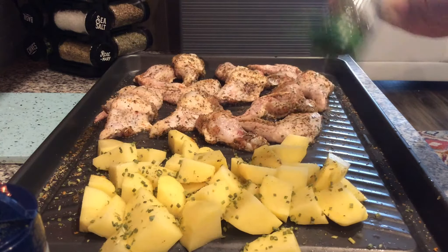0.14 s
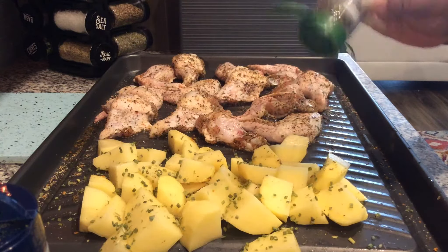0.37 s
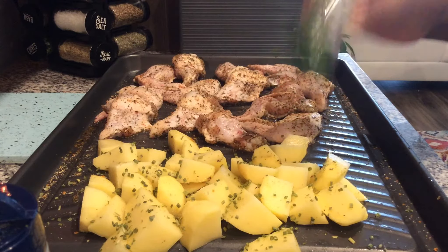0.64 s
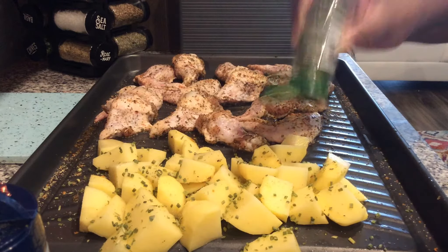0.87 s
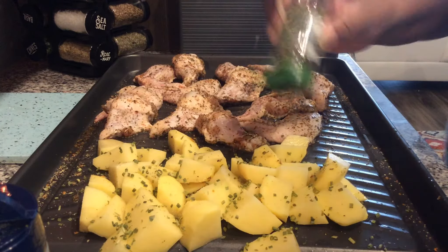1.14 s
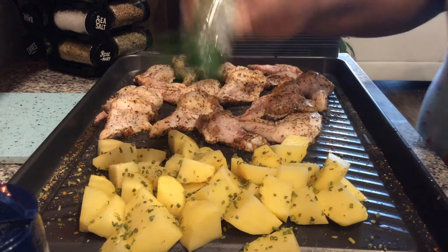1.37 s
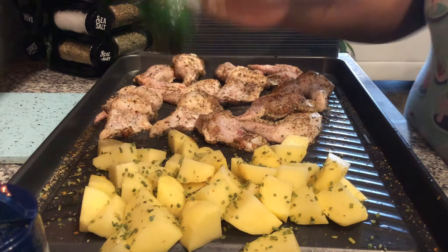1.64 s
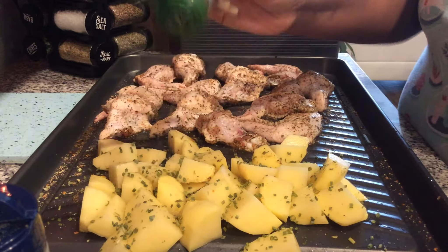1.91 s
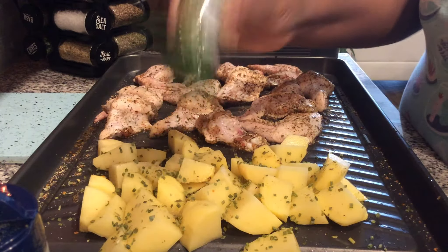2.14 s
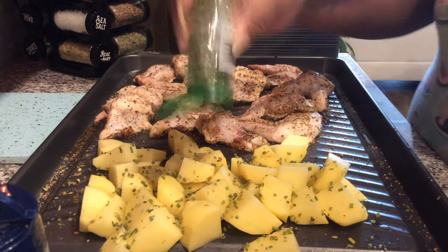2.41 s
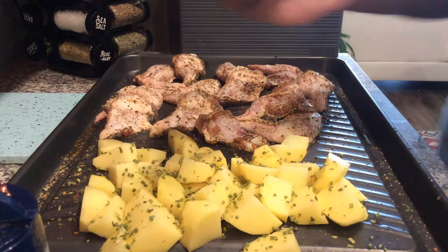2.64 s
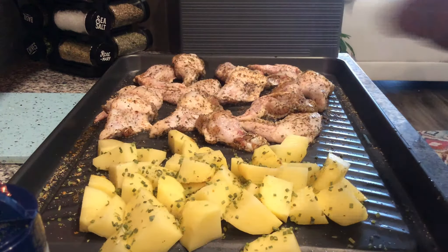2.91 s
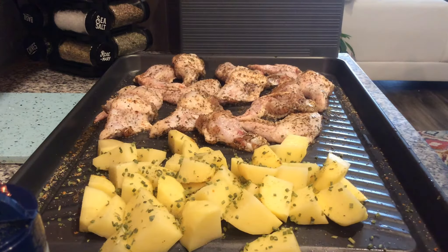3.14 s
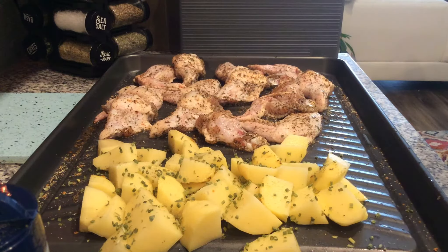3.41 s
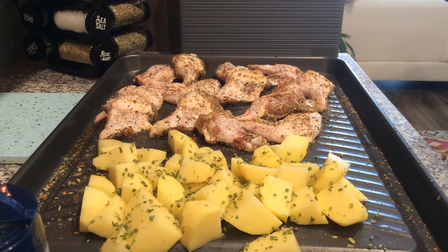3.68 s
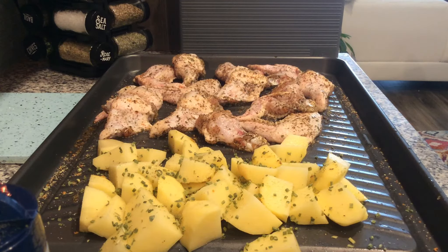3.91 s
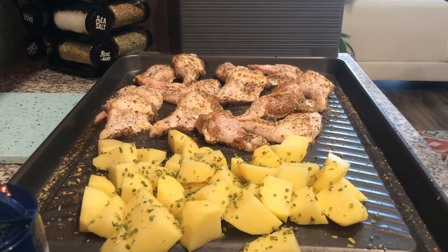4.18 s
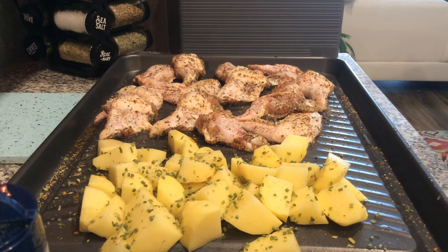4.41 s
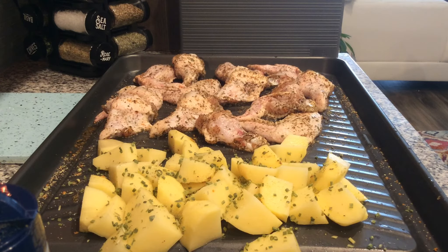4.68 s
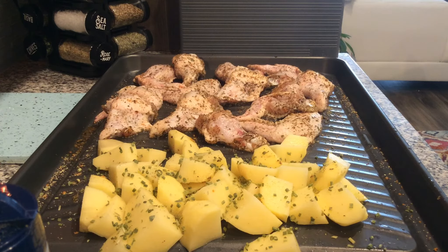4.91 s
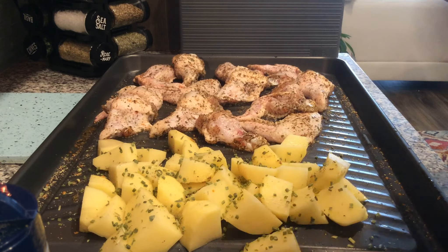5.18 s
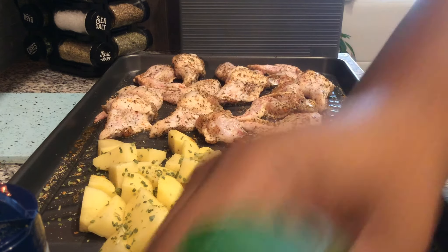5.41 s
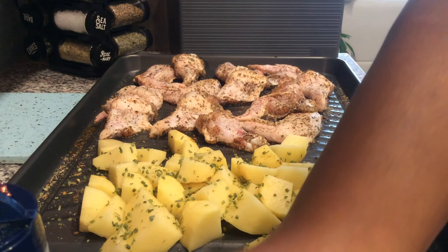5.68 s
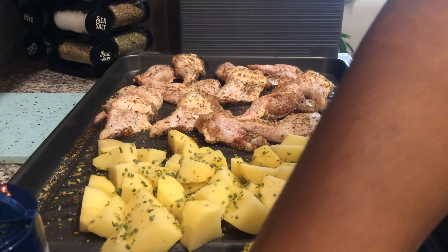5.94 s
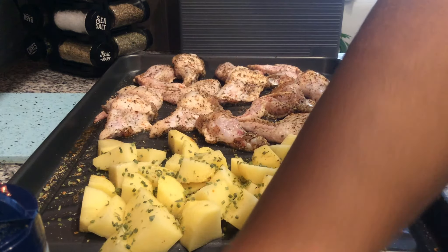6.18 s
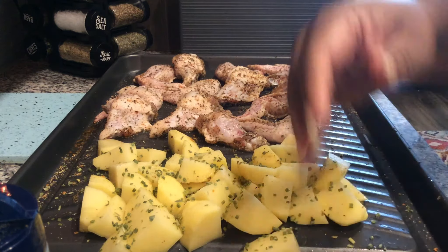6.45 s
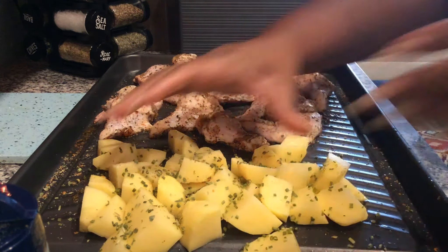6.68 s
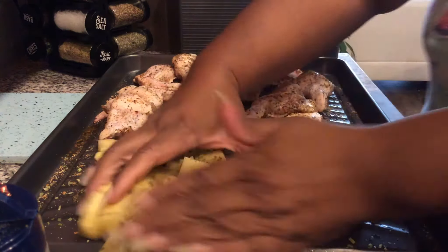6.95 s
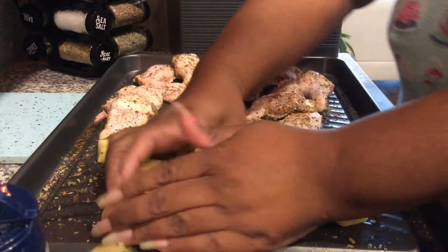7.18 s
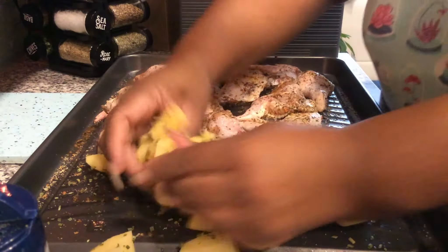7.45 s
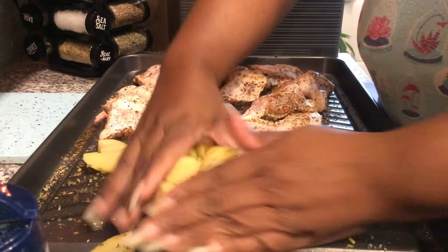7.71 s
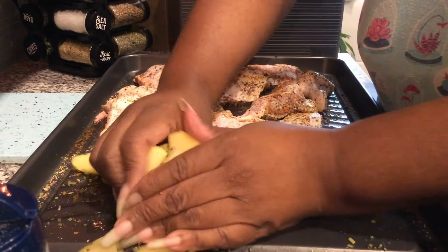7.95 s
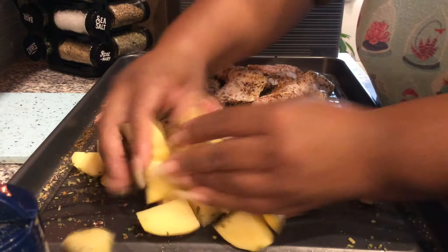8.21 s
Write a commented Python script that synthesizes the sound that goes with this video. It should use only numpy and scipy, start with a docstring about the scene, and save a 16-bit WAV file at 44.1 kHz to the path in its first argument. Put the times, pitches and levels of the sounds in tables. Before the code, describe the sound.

Dry herbs shaken in a jar over a kitchen hum, a glass clink and lid snap, a bottle knocked down, then potatoes tumbled on a pan.

```python
"""A kitchen hums and hisses throughout, built from shaped noise and wavering tones. First a glass jar of
dry herbs is shaken in bursts of fine and coarse grains; it clinks, its lid snaps shut and it is put away
with a tap, all ringing tones plus noise bursts. Then a bottle is set down hard on the counter and rocks once.
Last, two hands sweep cut potatoes over a ribbed pan (swelling grainy noise, catching nails), lift them
and let them tumble (damped low thuds, a knocking rim and a booming pan)."""
import sys
import numpy as np
from scipy import signal
from scipy.fft import rfft, irfft, next_fast_len
from scipy.io import wavfile
from scipy.ndimage import uniform_filter1d, map_coordinates

SR = 44100
rng = np.random.default_rng(int(sys.argv[2]) if len(sys.argv) > 2 else 0)


def put_to_file(sound):
    """Save the sound as 16-bit audio at rate SR, in the file named by the first command-line argument."""
    columns = np.atleast_2d(sound).T  # one column per channel
    safe = np.clip(columns, -1, 1)
    whole_steps = np.round(safe * 32767)
    wavfile.write(sys.argv[1], SR, whole_steps.astype(np.int16))


def voltage_ratio(decibels):
    """Convert decibels (scalar or array-like) to amplitude ratios, 20 dB per decade."""
    exponent = np.asarray(decibels, float) / 20
    return 10 ** exponent


N = 367201  # length in samples

# Every "colour" table is the shape of a spectrum: pitch_hz, level_db (per Hz, relative)

# kitchen background over time: time_s, hum_db, midrange_rush_db, hiss_db
KITCHEN_LEVELS = [(0, -40, -62, -60), (2.2, -39.5, -63.5, -54), (2.6, -38.5, -53.5, -52.5),
                  (3.3, -37.5, -57, -56), (3.95, -38, -55, -51), (4.6, -38.5, -56.5, -55),
                  (5.8, -39, -63, -59.5), (6.4, -38.5, -58.5, -59), (7, -39, -55, -52.5),
                  (8.33, -38.5, -56, -50.5)]
# colours of the hum, the midrange rush and the hiss: pitch_hz, level_db
HUM_COLOUR = [(15, -62), (25, -28.5), (43, -15.5), (115, -0.5), (213, -5.5), (244, 1), (275, -15),
              (338, -7.5), (388, -10.5), (444, -14), (743, -20.5), (1060, -22.5), (1500, -29.5),
              (1950, -60), (3300, -120)]
RUSH_COLOUR = [(450, -37.5), (650, -4.5), (760, 11.5), (900, -14), (1250, -0.5), (1500, 1), (1800, -20),
               (2600, -13), (3500, -42)]
HISS_COLOUR = [(880, -30.5), (1500, 0), (2460, 1.5), (2610, -5), (2880, 1.5), (3120, -0.5), (4640, -3),
               (5380, -2.5), (6690, -5), (9280, -2), (10000, -3), (14900, -9.5), (16000, -26)]
# wavering appliance tones: pitch_hz, level_db (on top of the hum level), waver_hz
APPLIANCE_TONES = [(56, -15, 2.6), (83.7, -13, 0.96), (120, -9, 2.5), (252.6, -8, 1.5),
                   (337.5, -12.5, 1.986), (448, -17.5, 2), (2960, -30, .8)]

# herbs landing in the jar at the end of each stroke:
# peak_s, level_db, length (times the usual slap), coarse_db (against level_db)
SHAKES = [(.009, -38, 1.7, -11), (.077, -50, 1, -8), (.134, -49.5, 0.99, -9), (.213, -41.5, 1.55, -7.5),
          (.35, -50, 0.89, -10), (0.416, -44.5, 1.7, -7), (0.633, -41.5, 1.2, -7.5),
          (0.847, -38, 1.5, -6.5), (1.052, -39, 1.24, -11.5), (1.279, -39, 1.33, -8.5),
          (1.496, -35, 1.15, -14), (1.712, -33, 1.06, -10), (1.935, -29, 0.91, -13.5),
          (2.142, -33, 1.17, -14), (2.34, -37.5, 1.06, -10), (2.544, -37, 1.4, -10.5)]
# colours of the fine herbs and of coarser bits against the lid: pitch_hz, level_db
HERB_COLOUR = [(710, -57.5), (1200, -26.5), (1440, -11), (1630, -22), (2060, -19.5), (2320, -20),
               (2980, -15), (4650, -13.5), (5300, -14.5), (8500, -2.5), (9310, 0.5), (10100, -3.5),
               (13600, -5.5), (15500, -8.5), (16300, -36)]
RATTLE_COLOUR = [(1500, -36), (2000, -6), (2500, -6.5), (3000, -3), (3400, 0.5), (4000, -3.5), (5500, -9),
                 (7000, 0), (9000, -41)]
# flakes sliding between strokes, and narrow hiss: time_s, flakes_db, one_band_db, three_bands_db
SLIDE_LEVELS = [(0, -65.5, -80, -80), (.8, -62, -80, -80), (1.55, -68, -75, -80), (1.7, -57.5, -61, -76),
                (2.3, -57, -59, -66), (2.7, -61, -59, -61.5), (3.7, -55, -65.5, -65.5),
                (4.1, -80.5, -66.5, -51), (5, -80, -78.5, -72.5), (8.4, -70, -93, -90.5)]
# colours of the one band and of the three other bands: pitch_hz, level_db
ONE_BAND_COLOUR = [(7300, -51), (7950, -18), (8150, -5.5), (8280, 1.5), (8420, -9), (8900, -40.5)]
THREE_BANDS_COLOUR = [(5800, -40.5), (6200, -15.5), (6300, -1.5), (6420, -12.5), (7300, -40.5), (8500, -17),
                      (8600, -0.5), (8720, -17.5), (9280, -19), (9400, 0.5), (9520, -17), (10500, -46.5)]
SHAKE_RISE_S, SHAKE_FALL_S = 0.0061, 0.0082  # the usual slap
SKIRT_DB, SKIRT_LONGER = -16, 3.8  # stray flakes before and after the slap

# short swells of narrow hiss, from the jar in the hand and from wet skin on the pan:
# peak_s, rise_s, fall_s, level_db, pitch_hz
SQUEAKS = [(.215, 0.0069, 0.0097, -54, 3230), (.305, .008, .008, -51, 1500), (.355, .005, .012, -54, 6400),
           (.478, .006, .008, -54, 1600), (.48, 0.006, 0.0074, -54, 2300), (.78, 0.054, 0.088, -59.5, 2900),
           (1.595, 0.0045, .01, -57, 2210), (1.95, 0.054, 0.15, -60, 1430), (1.97, 0.043, .05, -54, 2620),
           (2.56, 0.019, 0.087, -53.5, 1366), (7.24, 0.018, .02, -39, 4370), (7.25, .015, .015, -33, 8200),
           (7.27, .02, .02, -36, 5670), (7.286, .02, .015, -41.5, 3830), (7.305, .015, .01, -45.5, 2380),
           (7.365, .003, 0.015, -40.5, 5300), (7.375, .006, .008, -40.5, 2830),
           (7.38, 0.011, 0.0091, -32, 4030), (7.452, .003, 0.0093, -37.5, 4120),
           (7.452, .003, .008, -42, 5300), (7.49, .02, 0.026, -37, 9700), (7.515, .025, .03, -40, 9200),
           (7.99, .015, 0.034, -43, 8160), (8.075, .02, 0.031, -40, 8200),
           (8.027, 0.004, 0.0059, -29, 7800), (8.242, 0.014, 0.0087, -36, 8300)]
SQUEAK_WIDTH = 0.06  # share of its pitch

# soft low bumps through the counter: start_s, level_db, pitch_hz, t60_s (time to die by 60 dB)
BUMPS = [(1.43, -23, 94, 0.086), (2.53, -28, 120, 0.27), (2.6, -24, 56, 0.11), (5.9, -15.5, 74.6, 0.21),
         (5.902, -26.5, 222, 0.38)]
# small ticks of things in the hand: start_s, level_db, tilt_db (per octave)
TICKS = [(1.6541, -39.5, 2), (1.8833, -43.5, 3), (3.1338, -43.5, 2), (3.275, -49.5, -3),
         (3.3633, -38.5, -5.5), (3.5125, -45, -6), (4.5361, -41.5, 1), (4.6483, -44.5, 0), (4.78, -45, 3.5),
         (4.8357, -40.5, 1), (4.9442, -40, -3), (4.981, -46.5, -11), (5.1577, -42.5, -1.5),
         (5.5243, -48.5, 12.5)]
# colour of an untilted tick: pitch_hz, level_db
TICK_COLOUR = [(1470, -36), (2500, -14), (3040, -20), (3230, -17), (3800, -4.5), (4340, -11.5),
               (5920, -8.5), (6450, 1.5), (7130, -8.5), (9220, 3), (9890, -3.5), (14100, -7.5),
               (16000, -22)]
TICK_T60_S = 0.055

# Each thing struck has three tables:
#   blows: start_s, ring_db, crack_db, crack_t60_s, contact_s
#   ringing modes: pitch_hz, level_db (on top of ring_db), t60_s
#   colour of the crack: pitch_hz, level_db
# glass clink
CLINK_BLOWS = [(3.8185, -21, -13.5, 0.01, 0.00087), (3.8215, -11, -8, 0.021, 0.00045),
               (3.828, -22, -19, 0.071, 0.0011)]
GLASS_MODES = [(6090, -10, .04), (6145, 2, 0.044), (6380, -21.5, .3), (6420, -22.5, .3), (8230, -8.5, .07)]
GLASS_CRACK = [(180, -54), (300, -26), (1300, -23.5), (3190, -29), (5250, -14), (5900, -11.5), (6150, -3.5),
               (6500, -7), (6960, -16.5), (8220, -9), (12300, -6), (15600, -13.5), (16200, -27.5)]
# lid snapping shut
SNAP_BLOWS = [(3.987, -43.5, -39.5, 0.04, .0017), (3.998, -45.5, -38, 0.05, .001),
              (4.0101, -0.5, -6.5, 0.035, 0.00057), (4.0145, -30.5, -16, 0.042, 0.00025)]
LID_MODES = [(385, -3.5, 0.04), (372, -28, .25), (415, -22.5, .25), (470, -25.5, 0.34), (740, -26, .08),
             (1455, -31.5, 0.33), (1555, 1.5, 0.026), (1530, -27, .4), (1590, -28.5, .35),
             (1620, -1, 0.012), (2100, -11.5, .02), (3350, -7.5, 0.0028)]
LID_CRACK = [(290, -28.5), (480, -3.5), (560, -15.5), (750, -5.5), (1110, -21.5), (1510, -6.5), (1980, -12),
             (2600, -15), (3440, -11), (5240, -21.5), (8330, -9), (10700, -5.5), (15500, -10.5),
             (16200, -33)]
# jar tap
TAP_BLOWS = [(4.2135, -39, -29.5, .02, .0003), (4.2163, -10, -16.5, 0.029, 0.00026)]
JAR_MODES = [(816, -13, 0.038), (1520, -0.5, 0.02), (1890, 11.5, 0.0034), (2230, -3, 0.013),
             (3520, -7, 0.0077)]
JAR_CRACK = [(150, -35), (250, -4), (900, -15.5), (1500, -9.5), (2800, -12), (5800, -23), (9300, -13),
             (12000, -11.5), (14500, -18), (16200, -35.5)]
# bottle set down
KNOCK_BLOWS = [(5.8795, -45.5, -34.5, 0.019, 0.00097), (5.891, -48, -29, 0.088, 0.00056),
               (5.9032, -9, -3, 0.04, 0.00031), (5.9075, -14, -8, .04, 0.00058),
               (5.913, -30, -13, .04, 0.0008), (5.926, -17, -11, 0.06, 0.0017),
               (5.940, -20.5, -13, 0.09, 0.0027), (5.953, -26, -13.5, 0.09, 0.0032),
               (5.96, -21, -11, .05, 0.0038), (5.974, -17, -22, 0.048, .004)]
BOTTLE_MODES = [(428, -3, 0.052), (548, -6, .08), (627, -14.5, 0.05), (711, -4, 0.067), (772, -6, 0.064),
                (951, -10, 0.18), (1205, -11, 0.049), (1470, -0.5, 0.056), (1500, -7.5, 0.026),
                (2120, -2.5, .04), (2260, -6.5, 0.088), (2337, -3.5, 0.032), (2642, -8.5, 0.08),
                (2890, -12, 0.099)]
BOTTLE_CRACK = [(120, -46), (200, -12), (299, -12.5), (612, -1.5), (1300, -10.5), (1590, -6), (2300, -10),
                (3800, -14), (4700, -18.5), (5150, -20), (5800, -28), (8900, -27), (14500, -32),
                (16200, -48)]
# bottle rocking, with the same bottle modes
ROCK_BLOWS = [(6.0427, -18.5, -11.5, 0.024, 0.0003), (6.0468, -16.5, -8, 0.028, 0.00064),
              (6.0522, -21, -12, 0.032, 0.0004), (6.0575, -23, -14, 0.029, .0006),
              (6.0625, -26, -11.5, 0.031, 0.0008), (6.0695, -32, -14, 0.033, .0012),
              (6.077, -24.5, -21, .04, .002), (6.106, -43, -27, .04, .001), (6.119, -41, -30, 0.034, .0015),
              (6.134, -45, -31, .04, .0015)]
ROCK_CRACK = [(120, -42), (200, -11), (440, -17), (696, -2), (836, -5), (1480, -6), (2050, -11),
              (2700, -24), (3100, -19), (5330, -40), (12400, -30.5), (16000, -60)]
DULL_CYCLES = 5.7  # a blow loses the treble that fits more cycles than this into its contact time
WANDER = 0.7  # radians a ring drifts in a hundredth of a second, times the root of its kHz
BLOW_SCATTER_DB = 1.5  # a mode's level changes from blow to blow

# strokes of hands and potato over the pan: peak_s, rise_s, fall_s, hiss_db, scrape_db (against hiss_db)
STROKES = [(7.08, 0.0052, 0.013, -21, -16.5), (7.15, 0.054, 0.042, -45.5, -3),
           (7.259, 0.033, 0.029, -31, -4.5), (7.3, 0.027, 0.013, -63.5, 24),
           (7.37, 0.0072, 0.023, -44.5, 2), (7.419, 0.012, 0.026, -41, -8.5), (7.52, 0.07, 0.12, -40.5, -8),
           (7.87, 0.015, 0.09, -47, -0.5), (7.97, 0.072, 0.045, -38.5, -5.5),
           (8.085, 0.064, 0.017, -35.5, -11), (8.114, 0.048, 0.0088, -37, 6.5),
           (8.245, 0.033, 0.053, -37.5, -12)]
# level of the low drag: time_s, level_db
DRAG_LEVELS = [(7.03, -51.5), (7.08, -43), (7.16, -42), (7.24, -48), (7.3, -36.5), (7.345, -57),
               (7.41, -40), (7.56, -50.5), (7.79, -55), (7.87, -42), (8.06, -37.5), (8.115, -29),
               (8.15, -48), (8.19, -53), (8.25, -44), (8.327, -51)]
# colours of the bright hiss, the mid scrape and the low drag: pitch_hz, level_db
BRIGHT_COLOUR = [(2940, -41), (5000, -11.5), (5960, -12), (8020, -7), (8620, -4.5), (11400, -5),
                 (13000, -9.5), (15500, -10.5), (16300, -36)]
SCRAPE_COLOUR = [(1180, -17), (2000, -3.5), (2390, -8), (2900, -4), (3900, 2.5), (4600, -3.5), (5500, -4.5),
                 (7000, -6.5), (9100, -16), (15400, -120)]
DRAG_COLOUR = [(290, -28), (500, -8), (531, -17), (767, -11), (884, -12), (1510, -9.5), (1740, -14),
               (3000, -12), (3900, -61), (6600, -120)]
# fingernails catching the ribs: start_s, level_db, mid_db (against bright), t60_s
NAILS = [(7.0454, -34, -8, 0.13), (7.0547, -26, -24, 0.021), (7.077, -40, -16, 0.053),
         (7.3591, -44.5, 12.5, 0.06), (7.4093, -33, -2, 0.056), (7.414, -34, 0, 0.05),
         (7.4481, -39.5, 12, 0.05), (7.736, -41, -15, 0.054), (7.847, -52, 13, 0.086),
         (8.26, -36, -13, 0.11)]
NAIL_CLICK_DB, NAIL_CLICK_T60_S = 2, 0.0027  # the first snap of a catch over its rasp

# potato pieces dropping on the pan: middle_s, level_db, pitch_hz, length_s
THUDS = [(7.169, -28, 78.5, 0.0352), (7.52, -31, 187.4, 0.0257), (7.603, -23, 170, 0.0156),
         (7.654, -25.5, 149, 0.0224), (7.669, -27, 164, .014), (7.682, -22, 150, 0.0136),
         (7.693, -13, 181.6, 0.0296), (7.734, -16, 164, 0.0205), (7.835, -27, 140, 0.0237),
         (7.86, -18, 111.5, 0.0325), (7.888, -20, 141, 0.0199), (7.909, -21, 151, 0.0204),
         (7.938, -20, 113, 0.0199), (7.956, -22, 109, 0.0186), (8.003, -24, 300, .008),
         (8.009, -19.5, 332, .008), (8.016, -20, 483, .02), (8.039, -20.5, 172, 0.0306),
         (8.087, -23, 338.5, .024), (8.09, -23, 160, .016), (8.105, -23, 167, 0.0133),
         (8.127, -18, 120, 0.017), (8.146, -26, 120, .018), (8.198, -32, 114, 0.0295),
         (8.222, -29.5, 187, 0.021), (8.264, -22.5, 136, 0.0249), (8.28, -25, 85, 0.0203),
         (8.298, -27, 110, 0.017), (8.317, -32.5, 444, .018)]
# the pan booming under the tumbling heap: time_s, level_db
BOOM_LEVELS = [(7.02, -71), (7.15, -44), (7.57, -43), (7.62, -47), (7.69, -25.5), (7.78, -51), (7.9, -36),
               (7.98, -42), (8.1, -27), (8.17, -47.5), (8.23, -32), (8.327, -46)]
# colour of the booming pan: pitch_hz, level_db
PAN_COLOUR = [(18, -47), (45, -4.5), (159, 3.5), (243, -7.5), (400, -10), (468, -7.5), (532, -31),
              (770, -9), (900, -49), (1170, -60), (1980, -120)]
# tones of the pan's rim: pitch_hz
RIM_HZ = (645, 755)
RIM_DB, RIM_GROWS = -3.5, 1.55  # the rim answers harder drops more than soft ones
OVERTONE_DB, THUD_NOISE_DB = -12, -8  # a thud is lopsided and rough

# how long the room rings: pitch_hz, t60_s
ROOM_T60 = [(150, 0.73), (500, 0.61), (2000, 0.56), (5000, 0.48), (9000, .45), (14000, 0.31)]
# loudness that turns the gain down, speed of its return, and the averaging times
GAIN_FROM_DB, GAIN_BACK_DB_PER_S, GAIN_SENSE_S, GAIN_FALL_S = -13.5, 2.5, 0.012, 0.09


def unit(x):
    """Scales a sound to rms 1."""
    return x / np.sqrt(np.mean(x ** 2) + 1e-20)


def along(points, hz):
    """Reads a table of (pitch, value) at any pitch, on a log axis."""
    pitches, values = np.transpose(points)
    return np.interp(np.log(hz + 1), np.log(pitches + 1), values)


def curves(rows):
    """Joins the rows into one value per sample for each column; silent before the first row."""
    times, *columns = np.transpose(rows)
    return [np.interp(np.arange(N) / SR, times, column, left=-120) for column in columns]


def wobble(rate):
    """A smooth random curve through `rate` random points a second."""
    knots = rng.standard_normal(int(N * rate / SR) + 4)
    return map_coordinates(knots, [np.arange(N) * rate / SR])


def coloured(x, spectrum):
    """Filters x by a colour table and scales it to rms 1."""
    m = next_fast_len(len(x) + 8192)
    gains = voltage_ratio(along(spectrum, np.fft.rfftfreq(m, 1 / SR)))
    return unit(irfft(rfft(x, m) * gains, m)[:len(x)])


def noise(spectrum):
    """Steady coloured noise for the whole scene."""
    return coloured(rng.standard_normal(N), spectrum)


def grit(spectrum, spiky_db, patchy_db):
    """Dense grains of uneven size, whose colour shifts in patches of time and pitch."""
    size_db = spiky_db * unit(uniform_filter1d(rng.standard_normal(N), size=16))
    z = signal.stft(rng.standard_normal(N) * voltage_ratio(size_db), nperseg=256)[2]
    patches = uniform_filter1d(rng.standard_normal(z.shape), size=4, axis=0)
    patches = uniform_filter1d(patches, size=9, axis=1)
    grains = signal.istft(z * voltage_ratio(patchy_db * unit(patches)), nperseg=256)[1][:N]
    return coloured(grains, spectrum)


def swell(s, rise, fall):
    """An envelope that climbs to 1 at s seconds and dies away again."""
    late = np.arange(N) / SR - s
    return np.exp(-np.abs(late) / np.where(late < 0, rise, fall))


def add(track, s, sound):
    """Lays a sound on a track at s seconds."""
    part = track[max(round(s * SR), 0):][:len(sound)]
    part += sound[:len(part)]


def soft_hits(rows, attack):
    """Damped tones with a soft start."""
    out, t = np.zeros(N), np.arange(SR // 2) / SR
    for s, db, hz, t60 in rows:
        onset = 1 - np.exp(-t / attack)
        add(out, s, voltage_ratio(db - 60 * t / t60) * onset * np.sin(2 * np.pi * hz * t))
    return out


def room(x):
    """The kitchen's echo: a noise tail, 4 ms late, in which each pitch dies at its own speed."""
    hz, t, z = signal.stft(rng.standard_normal(SR), SR, nperseg=256)
    decay = voltage_ratio(-60 * t / along(ROOM_T60, hz)[:, None])
    tail = signal.istft(z * decay, SR, nperseg=256)[1]
    late = np.pad(x, (round(.004 * SR), 0))
    return signal.fftconvolve(late, tail / np.linalg.norm(tail))[:N]


def blows(rows, modes, crack, ring_wet_db, crack_wet_db, cycles):
    """Each blow rings the modes and sets off a noise burst; a longer contact dulls both."""
    rings, bursts, clicks = np.zeros(N), np.zeros(N), np.zeros(N)
    t = np.arange(SR // 2) / SR
    for s, ring_db, crack_db, t60, contact in rows:
        lean = lambda hz: -20 * np.log10(1 + (hz * contact / DULL_CYCLES) ** 2)
        onset = 1 - np.exp(-t / contact)
        for hz, db, life in modes:
            build_up = 1 - np.exp(-t * hz / cycles)  # a mode takes a cycle or so to build up
            level = voltage_ratio(ring_db + db + lean(hz) + rng.normal(0, BLOW_SCATTER_DB) - 60 * t / life)
            # a loosely held thing rings unevenly
            drift = WANDER * np.sqrt(hz / 1000 * 100 / SR) * np.cumsum(rng.standard_normal(len(t)))
            drift = uniform_filter1d(drift, size=88, mode="nearest")
            ring = np.sin(2 * np.pi * hz * t + drift - drift[0])
            add(rings, s, onset * build_up * level * ring)
        colour = [(hz, db + lean(hz)) for hz, db in crack]
        burst = onset * voltage_ratio(crack_db - 60 * t / t60) * coloured(rng.standard_normal(len(t)), colour)
        add(bursts, s, burst)
        # the room hears the burst as one click of the same energy
        click = coloured(1. * (np.arange(4096) == 512), colour) / 64
        add(clicks, s + t60 / 10 - 512 / SR, np.linalg.norm(burst) * click)
    return rings + bursts + room(voltage_ratio(ring_wet_db) * rings + voltage_ratio(crack_wet_db) * clicks)


def kitchen():
    """Rumble, unsteady appliance tones, a midrange rush that swells for a while, and far hiss."""
    hum_db, rush_db, hiss_db = curves(KITCHEN_LEVELS)
    tones = np.zeros(N)
    for hz, db, waver in APPLIANCE_TONES:
        level = voltage_ratio(db + 1.12 * wobble(7.5))
        tones += level * np.sin(2 * np.pi * np.cumsum(hz + waver * wobble(8)) / SR)
    hum = voltage_ratio(-5.0 + 1.8 * wobble(6.1)) * noise(HUM_COLOUR) + tones
    rush = voltage_ratio(rush_db + 1.3 * wobble(3.21)) * noise(RUSH_COLOUR)
    hiss = voltage_ratio(hiss_db + 1.9 * wobble(1.8)) * noise(HISS_COLOUR)
    return voltage_ratio(hum_db) * hum + rush + hiss


def shaker():
    """Flakes slide, slap against the lid and settle: a burst of fine and coarse grains per stroke."""
    flakes_db, one_db, three_db = curves(SLIDE_LEVELS)
    slap = lambda s, longer: swell(s, longer * SHAKE_RISE_S, longer * SHAKE_FALL_S)
    one_band = voltage_ratio(one_db + 1.5 * wobble(10)) * noise(ONE_BAND_COLOUR)
    three_bands = voltage_ratio(three_db + 1.5 * wobble(14)) * noise(THREE_BANDS_COLOUR)
    fine_level = voltage_ratio(flakes_db + 3.0 * wobble(25))
    coarse_level = np.zeros(N)
    for s, db, longer, coarse_db in SHAKES:
        burst = voltage_ratio(db) * (slap(s, longer) + voltage_ratio(SKIRT_DB) * slap(s, SKIRT_LONGER * longer))
        fine_level += burst
        coarse_level += voltage_ratio(coarse_db) * burst
    fine = fine_level * grit(HERB_COLOUR, spiky_db=2.2, patchy_db=2.2)
    coarse = coarse_level * grit(RATTLE_COLOUR, spiky_db=3, patchy_db=4)
    return fine + coarse + one_band + three_bands


def squeaks():
    """Short swells of narrow, stuttering hiss from the jar in the hand and wet skin on the pan."""
    out = np.zeros(N)
    shape = [(-4, -40), (-1, -8), (0, 0), (1, -8), (4, -40)]  # (widths from the pitch, dB)
    for s, rise, fall, db, hz in SQUEAKS:
        band = [(hz * (1 + widths * SQUEAK_WIDTH), band_db) for widths, band_db in shape]
        stutter = voltage_ratio(4 * wobble(250)) * rng.standard_normal(N)
        out += voltage_ratio(db) * swell(s, rise, fall) * coloured(stutter, band)
    return out


def counter_bumps():
    """Soft bumps through the counter: damped low tones."""
    return soft_hits(BUMPS, attack=0.0079)


def ticks():
    """Things in the hand tick: short bright clicks of dying noise, some duller."""
    out, t = np.zeros(N), np.arange(SR // 10) / SR
    for s, db, tilt_db in TICKS:
        colour = [(hz, level + tilt_db * np.log2(hz / 8000)) for hz, level in TICK_COLOUR]
        add(out, s, voltage_ratio(db - 60 * t / TICK_T60_S) * coloured(rng.standard_normal(len(t)), colour))
    return out


def glass_clink():
    """The glass clinks: close blows ring its high modes."""
    return blows(CLINK_BLOWS, GLASS_MODES, GLASS_CRACK, ring_wet_db=-17, crack_wet_db=-13.0, cycles=.8)


def lid_snap():
    """The lid snaps shut: faint blows around one hard one."""
    return blows(SNAP_BLOWS, LID_MODES, LID_CRACK, ring_wet_db=-24.5, crack_wet_db=-3, cycles=0.98)


def jar_tap():
    """The jar taps as it is put away: its modes die within hundredths of a second."""
    return blows(TAP_BLOWS, JAR_MODES, JAR_CRACK, ring_wet_db=-29, crack_wet_db=-9.5, cycles=0.27)


def bottle_knock():
    """The bottle lands hard on the counter: a run of blows, the later ones blunter."""
    return blows(KNOCK_BLOWS, BOTTLE_MODES, BOTTLE_CRACK, ring_wet_db=-32.0, crack_wet_db=-9, cycles=0.3)


def bottle_rock():
    """The bottle rocks once: a rattle of weaker blows on the same modes."""
    return blows(ROCK_BLOWS, BOTTLE_MODES, ROCK_CRACK, ring_wet_db=-20, crack_wet_db=-12.5, cycles=0.21)


def hands():
    """Wet skin and potato rub over the ribs as swelling grit; nails catch with a click and a rasp."""
    hiss = sum(voltage_ratio(db) * swell(s, rise, fall) for s, rise, fall, db, _ in STROKES)
    scrape = sum(voltage_ratio(db + mid_db) * swell(s, rise, fall) for s, rise, fall, db, mid_db in STROKES)
    drag = voltage_ratio(curves(DRAG_LEVELS)[0])
    bright = grit(BRIGHT_COLOUR, spiky_db=3.5, patchy_db=2.2)
    mid = grit(SCRAPE_COLOUR, spiky_db=4, patchy_db=2.5)
    rub = hiss * voltage_ratio(2 * wobble(70)) * bright
    rub += scrape * voltage_ratio(2.8 * wobble(90)) * mid
    rub += drag * voltage_ratio(2.5 * wobble(25)) * grit(DRAG_COLOUR, spiky_db=2.5, patchy_db=1.5)
    for s, db, mid_db, t60 in NAILS:
        at = slice(round(s * SR), round(s * SR) + SR // 4)
        catch = bright[at] + voltage_ratio(mid_db) * mid[at]
        t = np.arange(len(catch)) / SR
        rasp = voltage_ratio(-60 * t / t60)
        click = voltage_ratio(NAIL_CLICK_DB - 60 * t / NAIL_CLICK_T60_S)
        add(rub, s, voltage_ratio(db) * (rasp + click) * catch)
    return rub


def potatoes():
    """Soft pieces load the sheet for a few cycles and knock its rim; the heap keeps it booming."""
    drops = np.zeros(N)
    rim_hits = []
    for s, db, hz, length in THUDS:
        t = np.arange(round(length * SR)) / SR
        turn = 2 * np.pi * hz * t + rng.uniform(0, 2 * np.pi)
        colour = [(hz / 3, -30), (hz / 2, -3), (hz, 0), (2 * hz, -6), (4 * hz, -20), (8 * hz, -60)]
        rough = coloured(rng.standard_normal(len(t)), colour)
        body = np.sin(turn) + voltage_ratio(OVERTONE_DB) * np.cos(2 * turn) + voltage_ratio(THUD_NOISE_DB) * rough
        arch = np.sin(np.pi * (t / length) ** .75)  # the sheet is loaded, then damped again
        add(drops, s - length / 2, voltage_ratio(db) * arch * body)
        rim_hits += [(s - length / 3, RIM_GROWS * db + RIM_DB, rim_hz, .05) for rim_hz in RIM_HZ]
    rim = soft_hits(rim_hits, attack=0.0065)
    boom = voltage_ratio(curves(BOOM_LEVELS)[0] + 4 * wobble(35)) * noise(PAN_COLOUR)
    return drops + rim + boom


def scene():
    """Mixes all the sources; each struck thing has its own share of room, the near sounds share one."""
    struck = glass_clink() + lid_snap() + bottle_knock() + jar_tap() + bottle_rock()
    near = squeaks() + shaker() + ticks() + hands() + potatoes()
    mix = struck + near + voltage_ratio(-12.5) * room(near) + counter_bumps() + kitchen()
    return mix[None]  # one channel


def gain_control(x):
    """Loud blows turn the gain down quickly; it creeps back at a steady rate."""
    # average over the last s seconds
    behind = lambda v, s: uniform_filter1d(v, int(s * SR), origin=(int(s * SR) - 1) // 2)
    loudness_db = 10 * np.log10(np.abs(behind(x ** 2, GAIN_SENSE_S)) + 1e-12)
    over_db = np.maximum(loudness_db - GAIN_FROM_DB, 0)
    creep_db = GAIN_BACK_DB_PER_S * np.arange(N) / SR
    held_db = np.maximum.accumulate(over_db + creep_db, axis=-1) - creep_db
    return x * voltage_ratio(-behind(held_db, GAIN_FALL_S))


def top_cut(x):
    """Nothing passes above the cut-off."""
    return signal.sosfilt(signal.butter(12, 16640, fs=SR, output="sos"), x)


def record(dry):
    """The microphone has a small treble peak and no deep bass; the loudest blows flatten at full scale."""
    peak = signal.lfilter(*signal.iirpeak(8250, 14, fs=SR), dry)
    heard = gain_control(dry + voltage_ratio(-11.0) * peak)
    clipped = heard / (1 + np.abs(heard) ** 6) ** (1 / 6)
    no_deep_bass = signal.butter(3, 38, "high", fs=SR, output="sos")
    finished = signal.sosfilt(no_deep_bass, clipped)
    return top_cut(finished)


dry = scene()
out = record(dry)
put_to_file(out)
```